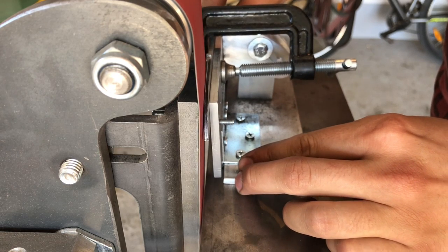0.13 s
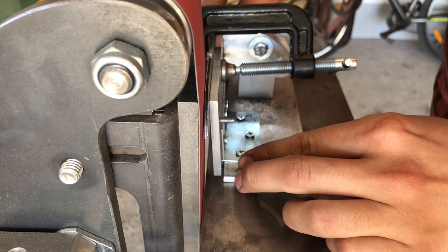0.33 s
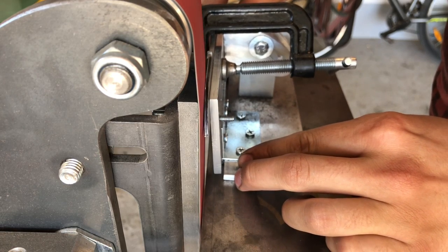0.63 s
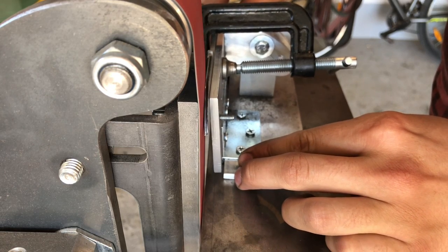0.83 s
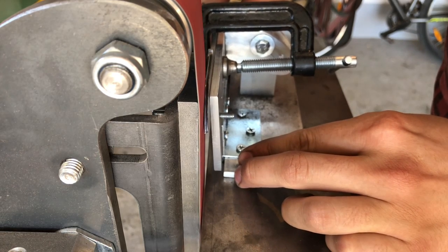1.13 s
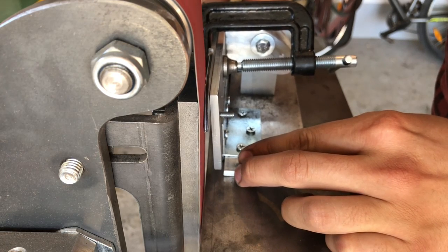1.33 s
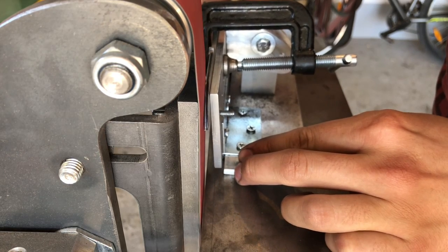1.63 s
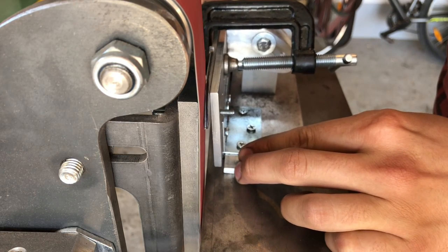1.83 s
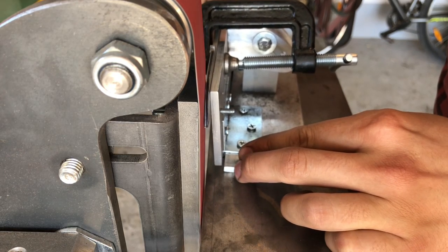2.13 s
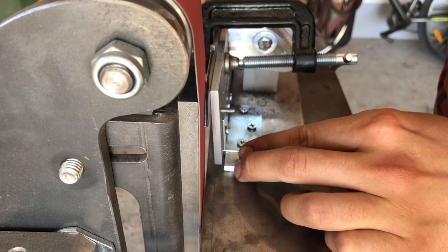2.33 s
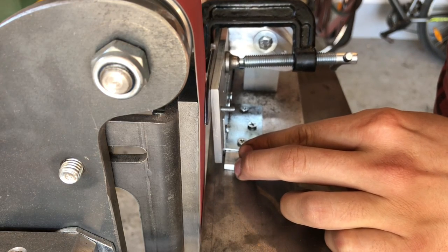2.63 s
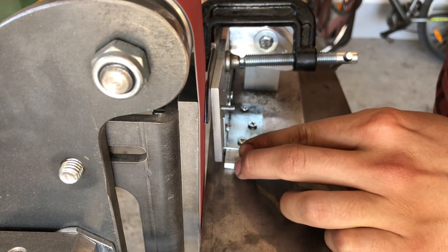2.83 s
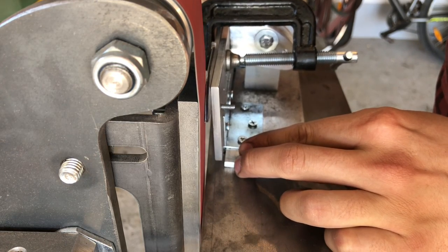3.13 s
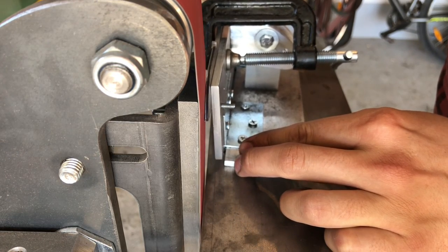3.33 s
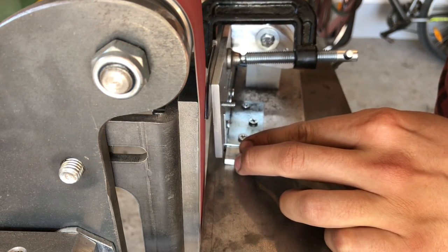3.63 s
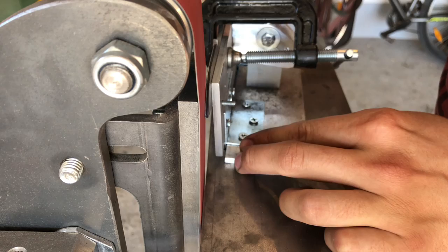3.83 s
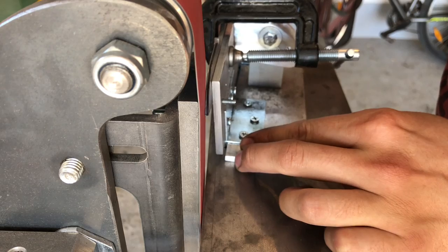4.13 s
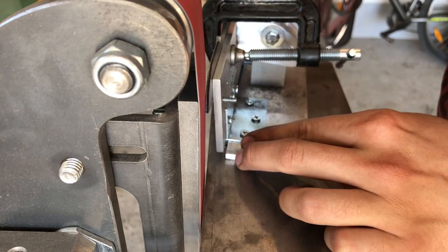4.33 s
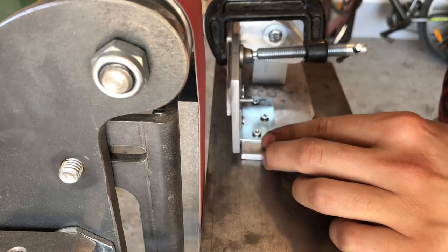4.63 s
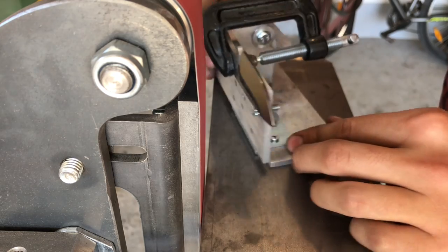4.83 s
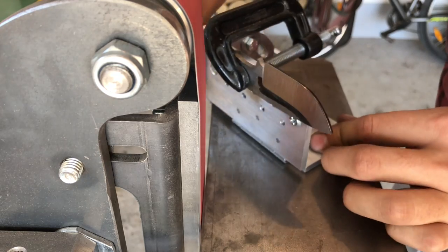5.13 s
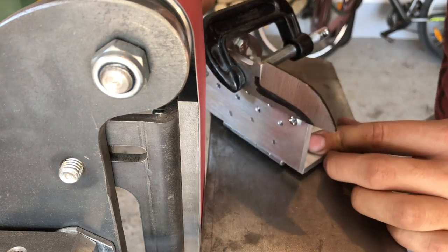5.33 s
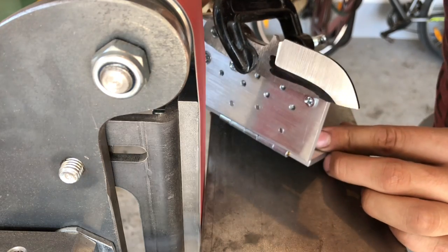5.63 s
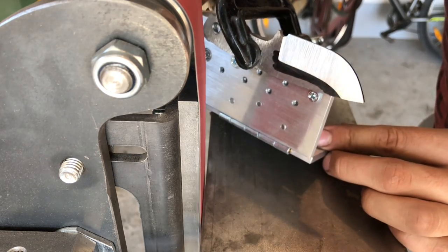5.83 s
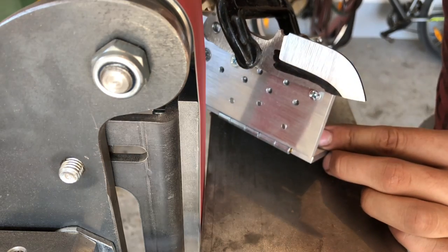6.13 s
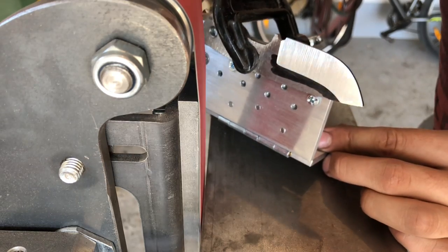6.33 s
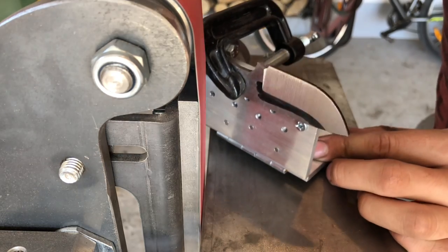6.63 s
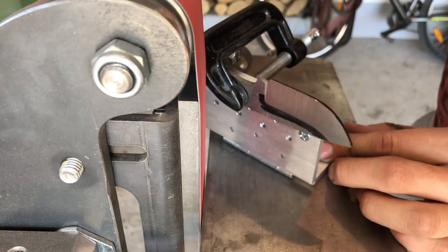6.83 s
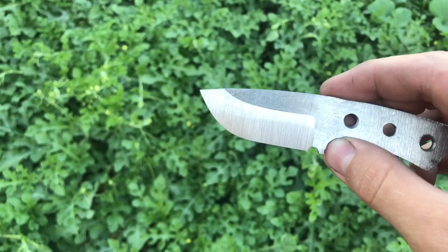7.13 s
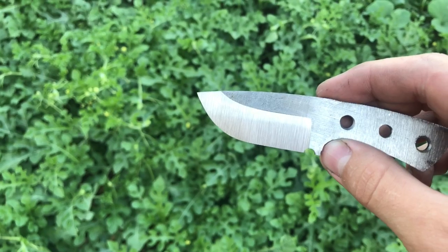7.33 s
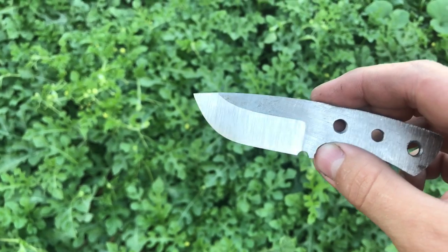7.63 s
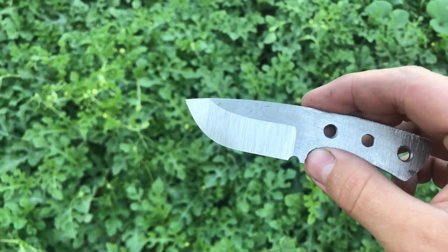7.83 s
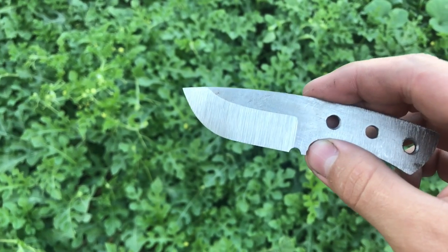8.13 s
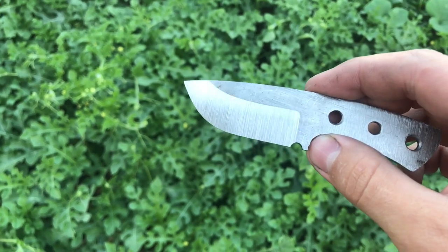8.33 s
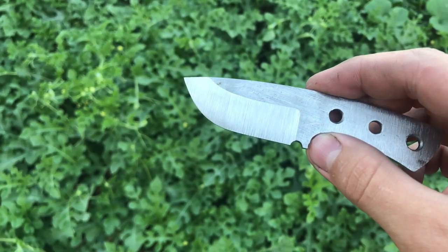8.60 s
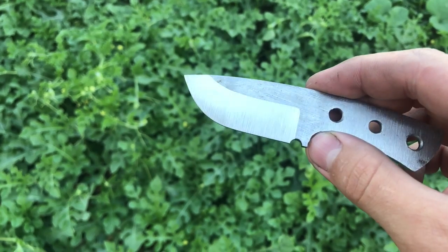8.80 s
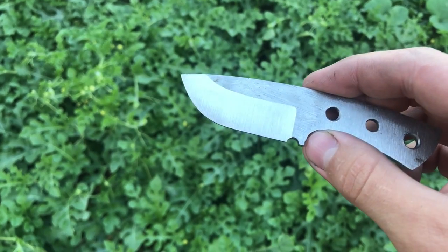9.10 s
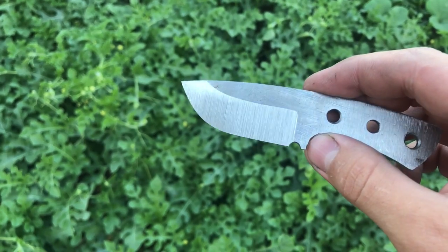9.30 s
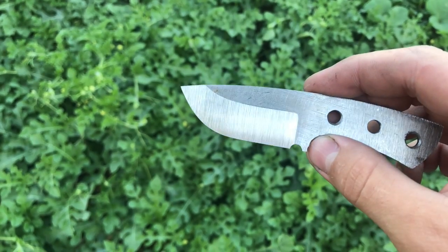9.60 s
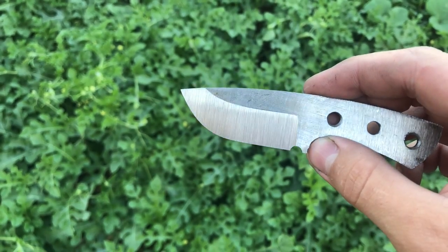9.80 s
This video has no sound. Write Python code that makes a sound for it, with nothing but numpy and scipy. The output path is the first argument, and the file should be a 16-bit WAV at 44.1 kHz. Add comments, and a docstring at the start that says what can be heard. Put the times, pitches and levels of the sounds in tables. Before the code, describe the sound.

From 0 to about 7 seconds a belt grinder roars loudly, close and dry, in a workshop. The broad gritty hiss repeats its texture about seven times a second, roughened by a faster flutter, with steely ringing around 4 kHz, a whining tone near 1 kHz and low motor hum. The bright top of the hiss dulls slightly between 2 and 3 seconds. From 4.3 to 4.9 the jig swings outward, shifting the balance of the rings; a blade resonance swells near 5.3. At 6.8 there is a short metallic knock, then brief ringing flares. Around 7.1 everything fades in an instant to a far quieter garden: low distant traffic, barely audible insects and faint bird chatter. A sparrow chirps clearly near 7.4, 8.3 and 9.1, with a short wall echo and weaker chirps between. A distant dog barks faintly at 7.3, 8.9 and 9.9.

```python
"""A belt grinder roars first, close and dry: a knife blade clamped in a jig is ground in a workshop.
The same grit returns on every lap of the belt, a faster flutter roughens it, blade, jig and platen ring, the
motor hums. Half-way the jig swings out to grind the tip, and the rings change balance. A quick fade leads to a
quiet garden: far traffic and thin insect song, a chirping sparrow with its wall echo, a distant dog.
Noise through spectra and resonances makes belt, steel and air; sines make hum and chirps, pulses the barks."""
import sys
import numpy as np
from scipy import signal
from scipy.fft import rfft, irfft
from scipy.io import wavfile

SR = 44100
rng = np.random.default_rng(int(sys.argv[2]) if len(sys.argv) > 2 else 0)


def to_wav(s):
    """Save 16-bit WAV."""
    ch = np.atleast_2d(s).T  # columns
    pcm = np.round(np.clip(ch, -1, 1) * 32767)  # PCM
    wavfile.write(sys.argv[1], SR, pcm.astype(np.int16))


N = 439236
T = np.arange(N) / SR
HZ = np.maximum(np.arange(N // 2 + 1) * SR / N, 1)
FADE_START_S, FADE_END_S = 7.052, 7.087


def from_db(db):
    """Decibels to gain."""
    return 10 ** (np.asarray(db) / 20)


def rms_one(x):
    """Scale to rms 1."""
    return x / np.sqrt(np.mean(x ** 2) + 1e-20)


def over_hz(rows):
    """Each column of a spectrum, joined on a log-frequency axis."""
    hz, *columns = np.transpose(rows)
    return [np.interp(np.log(HZ), np.log(hz), column) for column in columns]


def resonance(hz, width):
    """Gain of a steep-sided resonance, 1 on top; the width is taken 3 dB down."""
    return 1 / (1 + (np.sqrt(2) - 1) * (2 * (HZ - hz) / width) ** 2)


def coloured(gain):
    """Noise with the given relative gain at each frequency; rms 1."""
    return rms_one(irfft(rfft(rng.standard_normal(N)) * gain, N))


def drift(rate_hz):
    """Chance variation, mostly slower than the given rate; spread 1."""
    return coloured(1 / (1 + (HZ / rate_hz) ** 2))


def ramp(start_s, length_s):
    """An even move from 0 to 1."""
    return np.clip((T - start_s) / length_s, 0, 1)


# the belt runs a little faster once the load eases
LOADED_LAPS_PER_S, EASED_LAPS_PER_S, EASE_START_S, EASE_S = 7.370, 7.397, 3.6, 1.5


def belt_speed():
    """Laps of the belt per second."""
    return LOADED_LAPS_PER_S + (EASED_LAPS_PER_S - LOADED_LAPS_PER_S) * ramp(EASE_START_S, EASE_S)


# the hand swings the jig out to reach the tip, then lets it settle back by a share of the way
SWING_START_S, SWING_S = 4.27, 0.59
SETTLE_START_S, SETTLE_S, SETTLE_SHARE = 5.3, .5, .2


def jig_swing():
    """0 with the blade flat on the belt, 1 with the jig swung right out."""
    settling = SETTLE_SHARE * ramp(SETTLE_START_S, SETTLE_S)
    return np.clip(ramp(SWING_START_S, SWING_S) - settling, 0, 1)


def repeating_roughness(cycles, order=8):
    """One random stretch of roughness, read again on every cycle; white, rms 1 before it is read."""
    size = int(N / cycles[-1])
    # random phases at equal strength, finely sampled so that reading between points stays smooth
    profile = rms_one(irfft(np.exp(2j * np.pi * rng.random(size // 2)), order * size))
    return np.interp(cycles % 1 * len(profile), np.arange(len(profile)), profile)


# broad rub of belt and grit, at nominal contact force:
# [f/Hz, level/dB per Hz with blade flat, level/dB per Hz with jig swung out]
RUB_SPECTRUM = [(36.2, -108, -108), (64.6, -88.5, -90.5), (90, -81.5, -77), (175, -68.5, -69.5),
                (254.4, -74.5, -77), (410, -71.5, -73), (587, -78, -78), (1463, -74.5, -77),
                (2007, -79, -78.5), (3100, -76.5, -75.5), (5990, -69.5, -73), (10400, -74.5, -74.5),
                (12500, -72, -75), (15500, -80.5, -82.5)]
# resonances of platen, jig and blade, at nominal contact force:
# [f/Hz, width/Hz, level/dB per Hz with blade flat, level/dB per Hz with jig swung out]
STEEL_RINGS = [(839, 21.4, -69, -67), (898, 21, -75, -73), (1071, 53.5, -60, -60.5), (1152, 44, -71, -64.5),
               (1276, 69, -73.5, -71.5), (1769, 30, -65.5, -68), (2356, 26, -70.5, -64),
               (2520, 221, -73, -73.5), (2875, 60, -71.5, -68.5), (3757, 340, -67, -70.5),
               (3800, 35, -65.5, -64.5), (3970, 55, -68, -61.5), (4095, 38, -61.5, -61.5),
               (4223, 26, -62.5, -58.5), (4302, 27, -61.5, -62), (4370, 45, -65, -67.5),
               (4460, 330, -68.5, -66), (5020, 89, -70.5, -65.5), (5680, 190, -72, -69.5),
               (6180, 160, -73, -66), (6565, 400, -70, -66), (8620, 850, -71.5, -68.5),
               (8730, 2100, -71.5, -73.5)]
# what comes round again: [f/Hz, share of power with blade flat, share of power with jig swung out]
REPEATING_SHARE = [(100.4, 0.85, 0.46), (600, .85, .85), (1077, 0.9, 0.89), (1980, .4, 0.57),
                   (4200, 0.32, 0.5), (7000, .07, 0.23), (14000, .03, .1)]
# the flutter's part of what comes round, strongest near 1 kHz: [f/Hz, share of power]
FLUTTER_SHARE = [(500, 0.18), (830, 0.13), (1080, 0.63), (1500, 0.13), (3000, 0.027)]
FLUTTERS_PER_LAP = 4.67
SPLICE_AT_LAP = .84  # place of the splice, as a share of a lap
# a steady pressure; the bite is keen at first, then dulls, and the fresh steel of the tip restores some of it
PRESSURE_DB, KEEN_DB, DULLING_DB, TIP_KEEN_DB = 0.48, 1.24, -2.5, .9
DULL_START_S, DULL_S = 1.8, 1.1


def contact_force(laps, flutter_cycles, thickness_db, wobble_db, tremor_db):
    """Thick spots in the belt and the hand vary the contact force, which also wobbles with the flutter."""
    thickness = sum(np.cos(2 * np.pi * (k * laps + rng.random())) for k in (2, 3, 7, 9))
    wobble = np.sin(2 * np.pi * flutter_cycles)
    return from_db(PRESSURE_DB + thickness_db * thickness + wobble_db * wobble + tremor_db * drift(5))


def splice_slaps(laps, slap_db, slap_hz, slap_width_hz):
    """Once a lap the splice slaps the platen with a dull click; returned as a spectrum."""
    clicks = rms_one(np.diff(np.floor(laps - SPLICE_AT_LAP), prepend=-1))
    return from_db(slap_db) * rfft(clicks) * resonance(slap_hz, slap_width_hz)


def keen_top(rub, swung, keen_hz, patchy_db):
    """A keen bite brings out the top of the hiss, patchily."""
    keen_db = KEEN_DB + DULLING_DB * ramp(DULL_START_S, DULL_S) + TIP_KEEN_DB * swung
    top = irfft(rfft(rub) / (1 + (keen_hz / HZ) ** 6), N)
    return rub + top * (from_db(keen_db + patchy_db * drift(4)) - 1)


def grinding(thickness_db=0.15, wobble_db=0.34, tremor_db=0.16, patchy_db=.5, keen_hz=9000,
             slap_db=-4, slap_hz=950, slap_width_hz=450):
    """Belt grit, a faster flutter and freshly torn chips excite the steel, whose ring changes as the jig swings."""
    swung = jig_swing()
    laps = np.cumsum(belt_speed()) / SR
    flutter_cycles = laps * FLUTTERS_PER_LAP
    force = contact_force(laps, flutter_cycles, thickness_db, wobble_db, tremor_db)
    belt = rfft(force * repeating_roughness(laps))
    flutter = rfft(force * repeating_roughness(flutter_cycles))
    chips = rfft(force * rng.standard_normal(N))
    flutter_share = np.clip(over_hz(FLUTTER_SHARE)[0], 0, 1)
    cyclic = np.sqrt(1 - flutter_share) * belt + np.sqrt(flutter_share) * flutter
    slaps = splice_slaps(laps, slap_db, slap_hz, slap_width_hz)
    jolts = slaps + knocks(decay_s=0.023, clank_hz=1600, clank_width_hz=1600)
    rub = 0
    poses = zip((1 - swung, swung), over_hz(RUB_SPECTRUM), over_hz(REPEATING_SHARE))
    for pose, (weight, rub_db, share) in enumerate(poses):
        power = from_db(rub_db) ** 2
        for hz, width, *db in STEEL_RINGS:
            power = power + (from_db(db[pose]) * resonance(hz, width)) ** 2
        share = np.clip(share, 0, 1)
        drive = np.sqrt(share) * cyclic + np.sqrt(1 - share) * chips + jolts
        # SR / 2 turns power per Hz into gain for white noise of rms 1
        rub = rub + weight * irfft(drive * np.sqrt(power * SR / 2), N)
    return keen_top(rub, swung, keen_hz, patchy_db)


# mains hum: [f/Hz, rms level/dB]
MAINS_HUM = [(100, -60.5), (200, -54)]
# tones of motor, wheels and bearings, before they waver:
# [f/Hz at the starting speed, rms level/dB with blade flat, rms level/dB with jig swung out]
MACHINE_TONES = [(48.4, -71, -73), (84.5, -60, -55.5), (86.6, -64, -63), (176.5, -59.5, -58),
                 (398.7, -65, -53.5), (419, -57.5, -61), (672, -57.5, -61), (1060, -51, -51),
                 (1084, -46.5, -48), (1127, -52, -47), (4250, -49, -48), (4270, -50.5, -53)]


def motor(waver_db=1.0):
    """Steady mains hum, and tones that follow the belt speed and waver with the load."""
    speed, swung = belt_speed(), jig_swing()
    run_s = np.cumsum(speed / speed[0]) / SR  # time stretched by the belt speed
    out = sum(from_db(db) * np.sin(2 * np.pi * hz * T) for hz, db in MAINS_HUM)
    for hz, flat_db, swung_db in MACHINE_TONES:
        level_db = flat_db + swung * (swung_db - flat_db) + waver_db * drift(2)
        out = out + from_db(level_db) * np.sin(2 * np.pi * (hz * run_s + rng.random()))
    return np.sqrt(2) * out  # a sine of rms 1 peaks at root 2


# the sliding contact wakes one ring for a moment:
# [t/s of the peak, half length/s, f/Hz, width/Hz, rms level/dB at the peak]
BLADE_FLARES = [(3.8, 0.4, 1778, 36, -47), (4.35, .15, 8300, 500, -39.5), (5.25, 0.37, 2340, 60, -47),
                (6.92, .09, 3820, 250, -37), (6.98, .12, 2420, 160, -43.5)]


def flares():
    """Single rings of the blade swell and die as the contact slides along it."""
    out = 0
    for s, half_length_s, hz, width, db in BLADE_FLARES:
        swell = np.exp(-((T - s) / half_length_s) ** 2)
        out = out + from_db(db) * swell * coloured(resonance(hz, width))
    return out


# the jig knocks on the rest: [t/s, drive level/dB over steady rubbing of rms 1, before the clank resonance]
JIG_KNOCKS = [(6.841, 10)]


def knocks(decay_s, clank_hz, clank_width_hz):
    """Short metallic jolts, sudden then dying away, to be fed into the steel; returned as a spectrum."""
    jolts = sum(from_db(db) * (T >= s) * np.exp(-np.abs(T - s) / decay_s) for s, db in JIG_KNOCKS)
    return rfft(jolts * rng.standard_normal(N)) * resonance(clank_hz, clank_width_hz)


# garden air and far traffic, a spectral shape: [f/Hz, relative level/dB per Hz]
GARDEN_AIR = [(30, -28), (70, -3.5), (105, -12.5), (140, -11.5), (190, -16), (320, -10), (430, -15),
              (560, -17.5), (700, -23.5), (1230, -29.5), (2500, -36), (3800, -37), (11000, -44),
              (15500, -48.5)]
GARDEN_DB = -60  # rms of the air before it swells


def garden(swell_db=0.7, drone_hz=74, drone_db=-70, insect_hz=9650, insect_db=-91):
    """Far traffic with a low drone, thin insect song, the bird and the dog."""
    air = from_db(GARDEN_DB + swell_db * drift(3.5)) * coloured(from_db(over_hz(GARDEN_AIR)[0]))
    drone = from_db(drone_db) * coloured(resonance(drone_hz, 9.1))
    insects = from_db(insect_db) * coloured(resonance(insect_hz, 250))
    return air + drone + insects + sparrow() + dog()


def scattered(x, t60, wet_db):
    """Walls and foliage add a diffuse tail that falls 60 dB in t60 seconds."""
    tail = rng.standard_normal(SR) * from_db(-60 * T[:SR] / t60)
    return x + from_db(wet_db) * signal.fftconvolve(x, tail / np.sqrt(np.sum(tail ** 2)))[:N]


# chirps near and far, before echo and tail: [t/s, level/dB, pitch ratio, length ratio]
SPARROW_CHIRPS = [(7.205, -77, .87, .5), (7.441, -63.5, 0.99, 0.92), (8.165, -75, 1, 0.5),
                  (8.297, -63, .99, 0.96), (8.538, -74, 0.91, 0.47), (8.93, -74, .97, .6),
                  (9.08, -61, 1.01, 0.98), (9.92, -77, 1, 1)]
# the syllables of every chirp, before the chirp's own level and ratios:
# [delay/s, length/s, top pitch f/Hz, level/dB, roughness as share of pitch]
CHIRP_SYLLABLES = [(0, 0.048, 4230, 1.5, 0.02), (.034, .012, 4850, 0, .04), (.044, .084, 3700, 0, .04)]
# each syllable arches: its pitch sags at both ends (Hz, before the pitch ratio), its level swells and dies
SYLLABLE_SAG_HZ, SYLLABLE_SWELL = 380, .6


def sparrow(echo_s=0.036, echo_db=-7, flock_db=-81, flock_spread_db=2, flock_pitch_spread=.12, count=26):
    """A clear high syllable, a flick and a rough lower one, with one wall echo; a far flock chatters at random."""
    out, quiver = np.zeros(N), drift(300)
    flock = []
    for _ in range(count):
        s = FADE_END_S + (T[-1] - FADE_END_S) * rng.random()
        db = flock_db + flock_spread_db * rng.normal()
        flock.append((s, db, np.exp(flock_pitch_spread * rng.normal()), .5))
    for s, db, pitch, stretch in SPARROW_CHIRPS + flock:
        for delay_s, length_s, top_hz, syllable_db, rough in CHIRP_SYLLABLES:
            start, length = s + stretch * delay_s, stretch * length_s
            on = slice(*np.searchsorted(T, [start, start + length]))
            arch = np.abs(np.sin(np.pi * (T[on] - start) / length))
            hz = pitch * (top_hz - SYLLABLE_SAG_HZ * (1 - arch) ** 2) * (1 + rough * quiver[on])
            tone = np.sin(2 * np.pi * np.cumsum(hz) / SR)
            out[on] += from_db(db + syllable_db) * arch ** SYLLABLE_SWELL * tone
    out = out + from_db(echo_db) * np.interp(T - echo_s, T, out)
    return scattered(out, t60=.25, wet_db=-5)


# distant barks: [t/s of the peak, rms level/dB at the peak before the tail, mean pitch f/Hz]
DOG_BARKS = [(7.28, -70, 220), (8.9, -64.5, 212.6), (9.88, -67, 208)]


def dog(length_s=0.057, jitter=0.1, mouth_hz=720, mouth_width_hz=480):
    """Rough voice pulses through one mouth resonance, blurred by distance."""
    out, rough = 0, 1 + jitter * drift(119.6)
    for s, db, hz in DOG_BARKS:
        pulses = np.diff(np.floor(np.cumsum(hz * rough) / SR), prepend=0)
        voice = rms_one(irfft(rfft(pulses) * resonance(mouth_hz, mouth_width_hz) ** 3, N))
        out = out + from_db(db) * voice * np.exp(-((T - s) / length_s) ** 2)
    return scattered(out, t60=0.49, wet_db=-1)


def scene(fade_in_s=0.027):
    """The grinder fades out quickly and the garden fades in; both channels are alike."""
    shop = np.clip((FADE_END_S - T) / (FADE_END_S - FADE_START_S), 0, 1) ** 1.14
    # the garden starts just before the grinder is gone
    outdoors = np.clip((T - FADE_END_S) / fade_in_s + 0.13, 0, 1)
    mono = shop * (grinding() + flares() + motor()) + outdoors * garden()
    return np.array([mono, mono])


CUTOFF_HZ = 15750


def record(dry):
    """The microphone channel: a steep low-pass, run both ways so that nothing is delayed."""
    low_pass = signal.ellip(10, .05, 60, CUTOFF_HZ, fs=SR, output="sos")
    return signal.sosfiltfilt(low_pass, dry)


dry = scene()
out = record(dry)
to_wav(out)
```